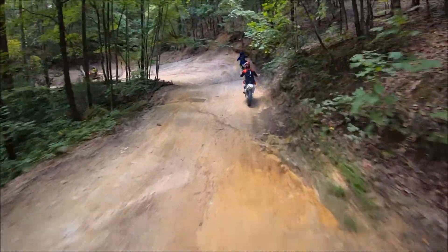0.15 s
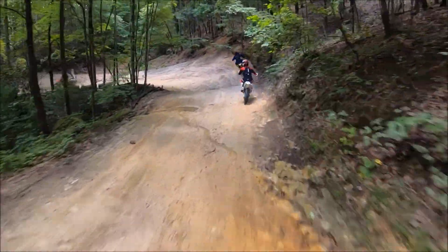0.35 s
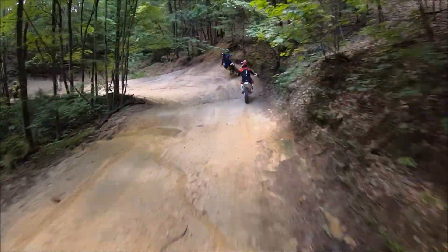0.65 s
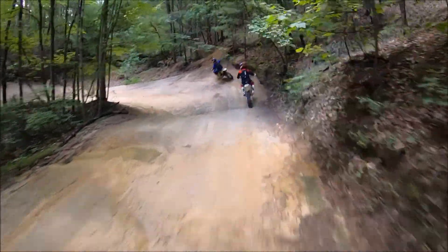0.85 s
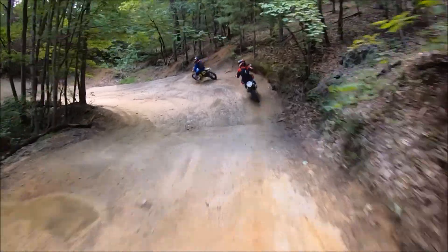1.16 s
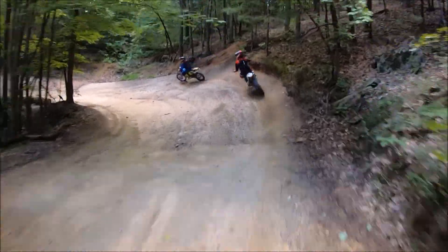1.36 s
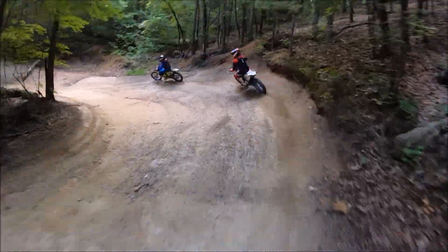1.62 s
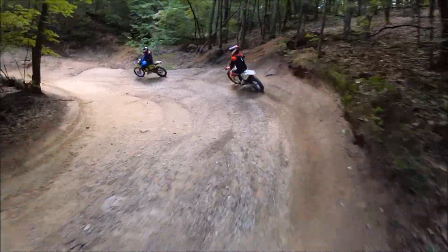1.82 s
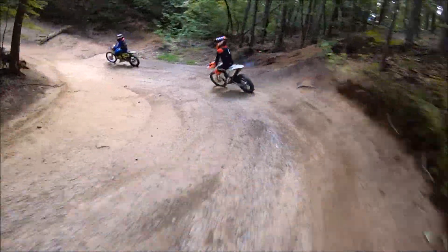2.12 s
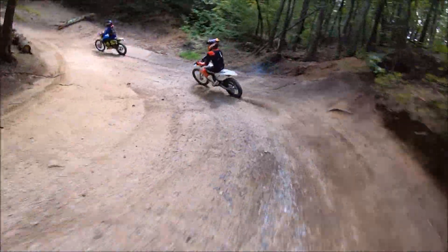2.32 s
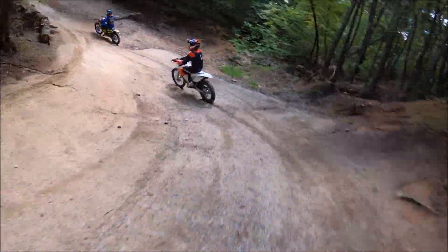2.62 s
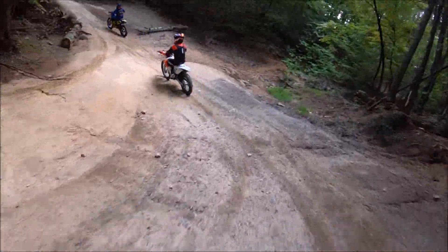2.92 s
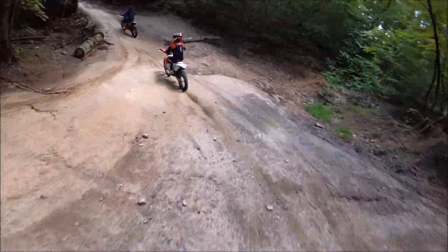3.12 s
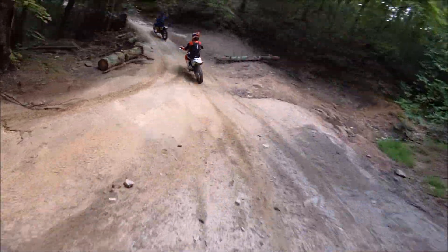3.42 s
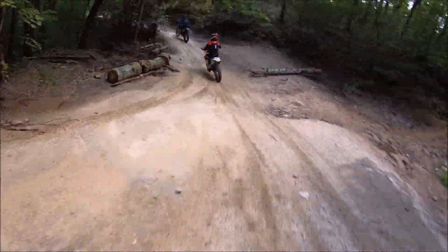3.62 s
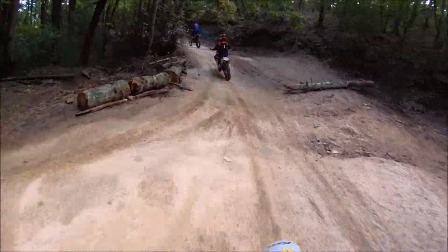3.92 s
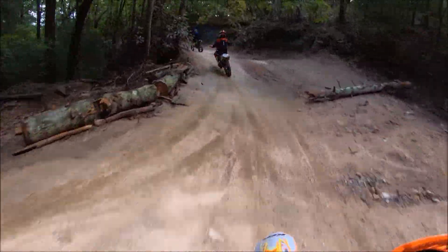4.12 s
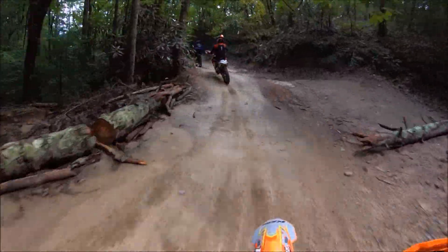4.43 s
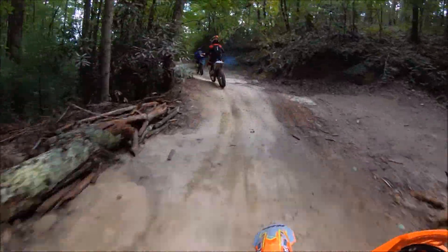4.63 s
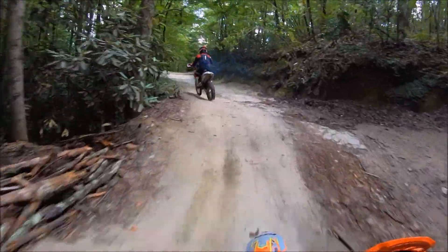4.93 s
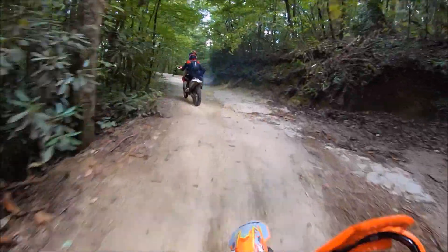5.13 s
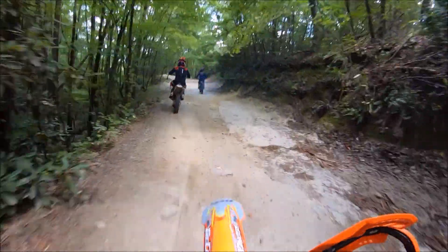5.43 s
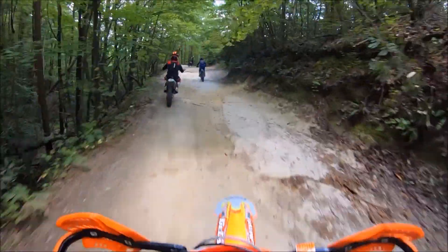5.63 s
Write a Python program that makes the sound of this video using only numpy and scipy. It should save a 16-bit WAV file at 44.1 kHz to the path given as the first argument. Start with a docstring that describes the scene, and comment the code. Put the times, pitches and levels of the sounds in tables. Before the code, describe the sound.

Close onboard sound of a small two-stroke dirt bike on a gravelly woodland track. It coasts with ragged popping, hollow intake bark, casing clatter and rattling metal; pitch falls and firing evens out. Then a loud, smooth low drone climbs, cuts abruptly to quieter wind and burble with stone clacks, and blares again.

```python
"""Single-cylinder two-stroke trail motorcycle on a bumpy dirt track, one microphone at the rider's helmet.
It opens on a brief even drone (multiples of crank speed through the pipe), then burbles off the throttle
(uneven blows and gas noise) with short bursts; stones clack and loose metal ticks, both as damped rings.
From 2.3 s it fires more evenly, from 3 s the throttle opens to a full drone, at 4.5 s it shuts, at 5.5 s it opens.
Throughout: ringing intake bark and casing clatter, wind and tyre roar of filtered noise, crackling gravel grains."""
import sys
import numpy as np
from scipy import signal
from scipy.io import wavfile
from scipy.ndimage import uniform_filter1d

SR = 44100
rng = np.random.default_rng(int(sys.argv[2]) if len(sys.argv) > 2 else 0)


def rack_gain(trim_db):
    """Turn a fader trim in dB into the linear factor to multiply a signal by."""
    fader = np.asarray(trim_db, float)
    return 10 ** (fader / 20)


def generate_wav(signal):
    """Clip the signal to [-1, 1] and save it as 16-bit WAV at the path in sys.argv[1]."""
    frames = np.transpose(np.atleast_2d(signal))
    scaled = np.clip(frames, -1, 1) * 32767
    pcm = np.round(scaled).astype(np.int16)
    wavfile.write(sys.argv[1], SR, pcm)


N = 253996  # length in samples

# Crank speed: time_s, speed_turns_per_s
CRANK_SPEED = [(0, 58), (.2, 59.5), (.44, 68), (.75, 74), (1.1, 76), (1.8, 71), (2.2, 53), (2.44, 53.3),
               (2.58, 50.5), (2.69, 53), (2.8, 55), (2.9, 55), (3.0, 55.8), (3.1, 58), (3.2, 62.8),
               (3.4, 65), (3.45, 68), (3.485, 62), (3.535, 77), (3.58, 66.5), (3.63, 64.5), (3.7, 68),
               (3.75, 66), (3.79, 65), (3.82, 66), (3.9, 72.4), (3.96, 74.4), (4.03, 77), (4.14, 77.2),
               (4.2, 76), (4.26, 83), (4.32, 81.7), (4.38, 83.9), (4.44, 84.8), (4.53, 83), (4.6, 73),
               (4.7, 71), (4.81, 66), (4.88, 56), (4.95, 61), (5.02, 63), (5.1, 59.5), (5.22, 67),
               (5.3, 60), (5.37, 66), (5.45, 61.5), (5.5, 64), (5.54, 76), (5.6, 74.3), (5.65, 72.8),
               (5.76, 72)]
# Exhaust between the bursts: time_s, level_db
EXHAUST_LEVEL = [(0, -26.5), (.14, -40), (.2, -31.5), (.6, -49), (1.0, -30.5), (1.5, -47), (2.0, -34.5),
                 (2.23, -25), (2.5, -27), (3.1, -24), (3.24, -17.5), (3.31, -23.5), (3.42, -27.5),
                 (3.479, -22.5), (3.486, -15), (3.54, -14), (3.58, -17.5), (3.69, -16.5), (3.72, -20),
                 (3.77, -17.5), (3.8, -17), (3.95, -14.5), (4.42, -18), (4.44, -23), (4.53, -27.5),
                 (4.55, -31.5), (4.7, -33.5), (4.85, -28), (5.0, -28), (5.5, -23.5), (5.52, -14),
                 (5.76, -15)]
# Engine load: time_s, even_share (0-1 of exhaust power from even firing), throttle (0 shut, 1 wide)
ENGINE_LOAD = [(0, .93, .6), (.13, .9, .6), (.17, .3, 0), (2.2, .25, 0), (2.3, .8, 0), (2.9, .86, 0),
               (3.1, .96, .25), (3.27, .97, .55), (3.31, .6, .3), (3.44, .7, .8), (3.5, .97, 1),
               (3.6, .99, .9), (3.82, .99, .9), (3.92, .99, 1), (4.42, .99, 1), (4.53, .97, .9),
               (4.56, .4, 0), (4.8, .3, .1), (4.95, .5, .15), (5.05, .35, .1), (5.15, .4, .2),
               (5.3, .4, .3), (5.505, .45, .45), (5.53, .98, 1.25), (5.76, .98, 1.2)]
# What the pipe passes of even firing: pitch_hz, shut_db, open_db (throttle shut or open)
PIPE_RESPONSE = [(50, -16, -27), (110, -3, -22), (160, -6, -17), (200, -5, -21), (240, 0, -9), (265, -2, 0),
                 (335, -11, 1), (352, -12, -10), (390, -11, -12), (470, -15, -22), (540, -19, -27),
                 (670, -17, -29), (780, -14, -35), (950, -18, -42), (1200, -28, -25), (1500, -40, -40),
                 (2300, -55, -50)]
# Shape of one even blow-down: multiple (of crank speed), level_db
BLOWDOWN_ORDERS = [(1, 4.5), (2, 0.5), (3, -0.5), (4, 5.5), (5, -5.5), (6, -6.5), (7, -10), (8, 3), (9, 0),
                   (10, 6), (12, -1), (18, -10)]
# Multiples that stand out for a while: start_s, end_s, multiple (of crank speed), level_db (against whole drone)
ORDER_SWELLS = [(0, 0.16, 5, -6), (2.25, 2.45, 5, -4.5), (2.45, 2.7, 3, -6), (2.66, 2.78, 7, -9),
                (2.76, 2.92, 14, -17), (3.1, 3.27, 12, -24), (2.75, 3.1, 5, -9), (2.9, 3.42, 2, -13),
                (3.05, 3.25, 7, -17.5), (3.575, 3.63, 5, -7), (3.57, 3.85, 8, -24), (3.57, 3.85, 10, -28),
                (3.57, 3.9, 13, -29), (3.72, 3.84, 7, -24), (3.92, 4.22, 6, -26.5), (4, 4.45, 2, -22.5),
                (3.99, 4.25, 3, -17.5), (4, 4.4, 5, -23), (3.57, 3.68, 6, -24.5), (3.57, 3.66, 14, -29),
                (3.97, 4.24, 9, -29), (3.94, 4.2, 11, -38), (4, 4.24, 8, -32), (4.24, 4.45, 6, -25),
                (4, 4.22, 24, -47), (3.75, 3.84, 12, -30.5), (3.86, 4.22, 15, -34), (3.9, 4.22, 17, -35),
                (4.41, 4.6, 3, -3.5), (4.4, 4.5, 8, -29), (4.38, 4.48, 7, -29), (5.55, 5.755, 9, -33.5),
                (5.58, 5.8, 16, -33), (5.66, 5.8, 14, -35), (5.58, 5.8, 17, -40), (5.62, 5.8, 29, -46)]
# Colour of one uneven firing: pitch_hz, level_db
BURBLE_COLOUR = [(60, -22.5), (110, -3), (170, -9), (240, 2), (310, -1), (400, -8), (550, -14), (800, -23),
                 (1100, -38.5), (2000, -44), (16000, -130)]
# Off the throttle the charge catches for a few turns: peak_s, peak_db, length_s
CATCHING_BURSTS = [(0.058, -26.5, 0.13), (0.121, -20, 0.03), (0.388, -24.5, 0.32), (0.674, -24.5, 0.093),
                   (0.772, -31, 0.029), (0.856, -28.5, 0.08), (1.09, -37, 0.017), (1.374, -29, 0.27),
                   (1.508, -18.5, 0.02), (1.634, -25.5, 0.16), (1.697, -27, 0.056), (1.786, -24.5, 0.17),
                   (1.922, -28, 0.035), (3.454, -19, 0.029), (3.476, -13, 0.021), (5.075, -25.5, 0.091),
                   (4.97, -26, 0.093), (5.25, -29, 0.053), (5.336, -29, 0.045), (5.399, -24, 0.038),
                   (5.477, -18.5, 0.085)]
# Layer levels along the ride: time_s, wind_db, tyre_db (before a fixed lift), clatter_db, intake_db
RIDE_LEVELS = [(0, -30, -40, -50, -34.5), (.14, -25.5, -36.5, -48.5, -34), (.2, -31.5, -39, -50.5, -42),
               (.4, -22.5, -38, -47.5, -34), (.46, -25.5, -40, -47.5, -38.5), (.52, -29.5, -40.5, -47, -41),
               (.6, -28, -38, -48.5, -36), (.84, -29, -36, -48, -39), (.9, -26.5, -34.5, -45.5, -38),
               (.96, -27, -36.5, -47, -34), (1.27, -25, -37, -45, -37.5), (1.37, -27, -35, -45.5, -28),
               (1.43, -29, -34, -43, -33.5), (1.5, -43, -37, -44.5, -34), (1.6, -24.5, -35, -45, -32),
               (1.96, -30, -36, -45.5, -35.5), (2.2, -23, -35.5, -44, -30.5), (2.24, -23, -40, -40, -32),
               (2.3, -28, -35, -42, -29), (2.76, -27.5, -39.5, -47.5, -29), (3.0, -25.5, -38, -46.5, -29.5),
               (3.15, -33, -43.5, -45.5, -31.5), (3.56, -32.5, -45.5, -53.5, -35),
               (3.8, -41.5, -40.5, -54, -34), (3.9, -41.5, -40.5, -54, -41), (4.11, -37.5, -44, -54, -44.5),
               (4.45, -35.5, -39.5, -51, -60.5), (4.65, -32.5, -41.5, -54.5, -51),
               (4.85, -37, -44, -53, -49), (5.05, -28.5, -41.5, -50.5, -46), (5.3, -33.5, -41, -50, -39),
               (5.5, -32, -38.5, -46.5, -43.5), (5.56, -30.5, -44.5, -53, -45),
               (5.76, -36.5, -35.5, -49, -38)]
# Colour of the intake in its airbox: pitch_hz, level_db
AIRBOX_COLOUR = [(300, -35), (600, -1), (720, -0.5), (860, -2.5), (980, -3), (1100, -13.5), (1500, -45.5),
                 (16000, -130)]
# The one wandering pitch of the intake bark: time_s, pitch_hz, strength_db
INTAKE_RING = [(0, 842, 9.5), (.1, 826, 9), (.2, 820, 4.5), (.3, 735, 10), (.45, 807, 7.5), (.62, 877, 6.5),
               (1.0, 880, -1), (1.3, 780, 1.5), (1.335, 843, 6.5), (1.36, 749, 5), (1.41, 923, 10.5),
               (1.45, 840, 7), (1.55, 817, 6.5), (1.66, 892, 5), (1.8, 738, 2.5), (2.05, 832, 4.5),
               (2.35, 956, 0), (2.6, 952, 3.5), (2.66, 699, 2.5), (3.3, 769, 0), (3.6, 875, -4.5),
               (5.76, 817, -1)]
# Colour of the clatter and of the gravel: pitch_hz, level_db (per Hz)
CLATTER_COLOUR = [(1100, -31.5), (1700, -0.5), (2100, 0), (2600, -2.5), (3200, -5.5), (3600, -9),
                  (4300, -11.5), (5200, -14.5), (5800, -18), (8000, -24), (10000, -32.5), (12000, -40.5),
                  (14500, -63.5)]
# Rings of the engine casing: pitch_hz (before drift), width_hz, level_db (before drift)
CASING_RINGS = [(2600, 200, -4), (2850, 90, 2), (3050, 100, 7), (3260, 100, 5)]
# Clatter between the tyre roar and the casing rings: time_s, gain_db
CLATTER_HOLLOW = [(0, 4.5), (1.2, -5), (1.4, 5), (1.55, -5.5), (2.2, -2), (3.3, 1.5), (3.6, -3),
                  (3.95, 1.5), (4.1, -7.5), (4.3, -5), (4.45, 1), (4.6, -8), (4.8, -1), (5.0, 1), (5.5, -3),
                  (5.76, 1)]
# Colour of the wind: pitch_hz, level_db (per Hz)
WIND_COLOUR = [(15, -14), (35, -8), (70, -2.5), (120, -6.5), (200, -4), (400, -21), (800, -53),
               (16000, -140)]
# Colour of the tyre roar: pitch_hz, level_db (per Hz)
TYRE_COLOUR = [(150, -32.5), (350, 5), (550, -3.5), (800, -17), (1150, -6.5), (1400, -7.5), (1800, -17),
               (2600, -31.5), (16000, -120)]
# Single knocks of loose metal on bumps: start_s, peak_db (before a gentle low-pass)
METAL_KNOCKS = [(0.278, -39), (0.907, -43), (1.031, -29), (1.3585, -30.5), (1.3873, -37), (1.401, -26),
                (1.601, -39), (1.7492, -29), (2.133, -29.5), (2.175, -30), (2.189, -29), (2.2295, -34),
                (2.2324, -19), (2.232, -30), (2.2388, -24.5), (2.243, -38), (2.2564, -36), (2.7763, -37.5),
                (3.33, -45), (3.3614, -40), (3.3856, -28.5), (3.4442, -31.5), (5.1154, -47), (5.3892, -36),
                (5.4695, -44)]
# Loose metal buzzing once a crank turn: start_s, knocks (count), peak_db (nominal, mid-rattle)
METAL_RATTLES = [(.1134, 3, -38), (0.4011, 5, -28), (1.345, 9, -31.5), (1.8021, 3, -28), (3.117, 10, -33)]
# Modes of the loose metal: pitch_hz and level_db (both before random detuning), t60_s
METAL_MODES = [(2550, -1, .018), (3000, 1, .022), (3450, -4, .014), (4400, -9, .012), (5400, -11, .01),
               (6700, -16, .008), (8300, -24, .006)]
# Stones thrown against the frame: start_s, level_db (before the envelope), pitch_hz (nominal)
THROWN_STONES = [(0.205, -20.5, 760), (0.906, -16.5, 580), (2.779, -37, 674), (5.114, -23, 600),
                 (0.2737, -26.5, 1370), (0.689, -24.5, 1320), (4.2396, -32.5, 1110), (4.2873, -29, 1310),
                 (4.393, -30, 1350), (4.554, -40, 1200), (4.565, -28, 1350), (4.567, -28.5, 1670),
                 (4.633, -35, 1230), (5.0422, -30.5, 1440)]


def evened(x):
    """Scales to rms 1."""
    return x / np.sqrt(np.mean(x ** 2) + 1e-20)


def curve(rows, column=1):
    """One column of a time table, at every sample."""
    rows = np.array(rows)
    return np.interp(np.arange(N) / SR, rows[:, 0], rows[:, column])


def read(points, hz):
    """A spectrum in dB on a log frequency axis."""
    f, db = np.transpose(points)
    return np.interp(np.log(hz + 1), np.log(f + 1), db)


def slow(hz, size=32):
    """Random drift of rms 1 low-passed at hz; drawn coarsely and interpolated."""
    low_pass = signal.butter(2, hz, fs=SR / size, output="sos")
    coarse = signal.sosfilt(low_pass, rng.standard_normal((N + SR) // size + 1))
    coarse = coarse[SR // size:]  # the filter has settled by here
    return evened(np.interp(np.arange(N) / size, np.arange(len(coarse)), coarse))


def coloured(x, points):
    """Causal minimum-phase filter with the given spectrum, scaled to rms 1."""
    log_gain = np.log(rack_gain(read(points, abs(np.fft.fftfreq(8192, 1 / SR)))))
    response = np.fft.ifft(np.exp(np.conj(signal.hilbert(log_gain)))).real
    taps = response[:4096] * np.hanning(8192)[4096:]
    return evened(signal.oaconvolve(x, taps)[:N])


def clicks(s, size):
    """A train of single samples at the times s."""
    train = np.zeros(N)
    np.add.at(train, np.clip(np.round(s * SR).astype(int), 0, N - 1), size)
    return train


def resonate(x, hz, width_hz):
    """Shifts the curve hz down to zero, smooths, and shifts back: a resonance of gain 1."""
    turn = np.exp(2j * np.pi * np.cumsum(hz) / SR)
    r = np.exp(-np.pi * width_hz / SR)
    return 2 * (turn * signal.lfilter([1 - r], [1, -r], x / turn)).real


def swell(multiple):
    """How far one multiple stands out over time: soft rise, hold, soft fall."""
    t, edge_s = np.arange(N) / SR, 0.033
    return sum(rack_gain(db) * np.clip(np.minimum(t - start, end - t) / edge_s + .5, 0, 1)
               for start, end, k, db in ORDER_SWELLS if round(k) == multiple)


def drone(speed_hz, turns, even, throttle, wobble_db=.9, wander_db=3):
    """Even firing: multiples of the crank speed; the wider the throttle, the more the pipe's pass band booms."""
    hz, shut_db, open_db = np.transpose(PIPE_RESPONSE)
    # uneven burning shakes the timing and blurs the high multiples
    turns = turns + .05 * (1 - even) * slow(hz=30)
    out = standing = 0
    for k in range(1, 31):
        shut = read(np.c_[hz, shut_db], k * speed_hz)
        wide = read(np.c_[hz, open_db], k * speed_hz)
        pipe_db = (1 - throttle) * shut + throttle * wide
        unsteady = np.maximum(1 - throttle, min(k / 30, .6))
        waver_db = wobble_db * slow(hz=24.8) + wander_db * unsteady * slow(hz=9.1)
        db = pipe_db + np.interp(k, *np.transpose(BLOWDOWN_ORDERS)) + waver_db
        phase_drift = (.1 + .02 * k) * slow(hz=16)
        wave = np.cos(2 * np.pi * (k * turns + rng.random()) + phase_drift)
        out = out + rack_gain(db) * wave
        standing = standing + swell(k) * rack_gain(waver_db) * wave
    # level the drone by its running power in the main band
    band = signal.butter(2, [140, 450], "band", fs=SR, output="sos")
    power = uniform_filter1d(signal.sosfilt(band, out) ** 2, 6000)
    return out / np.sqrt(power + 1e-4) + np.sqrt(2) * standing


def burble(turns, spread_db=3, puff=.75):
    """Uneven firing: each turn burns well, badly or late, and turbulent gas follows each blow."""
    at = np.flatnonzero(np.diff(np.floor(turns))) / SR
    chance = rng.standard_normal((len(at), 2))
    blows = clicks(at + 0.00066 * chance[:, 0], rack_gain(spread_db * chance[:, 1]))
    gas_decay = np.exp(-1 / (0.017 * SR))  # 17 ms
    gas = signal.lfilter([1], [1, -gas_decay], blows) * rng.standard_normal(N)
    return evened(coloured(blows, BURBLE_COLOUR) + puff * coloured(gas, BURBLE_COLOUR))


def exhaust(speed_hz, turns):
    """Load shifts the power from burble to drone; uneven firing wavers and catches in bursts."""
    even, throttle = curve(ENGINE_LOAD, column=1), curve(ENGINE_LOAD, column=2)
    t, misfire_db = np.arange(N) / SR, -0.5
    power = rack_gain(2 * (curve(EXHAUST_LEVEL) + misfire_db * (0.5 - even) * slow(hz=16)))
    # each burst is a bell about 21 dB down at the ends of its length
    power += sum(rack_gain(2 * db) * np.exp(-(4.37 * (t - s) / length) ** 2) for s, db, length in CATCHING_BURSTS)
    firing = np.sqrt(even) * drone(speed_hz, turns, even, throttle) + np.sqrt(1 - even) * burble(turns)
    return np.sqrt(power) * firing


def intake(turns, puff=3.2):
    """The reed valve snaps open once a turn and gulps air through the airbox, more cleanly when firing is even."""
    at = np.flatnonzero(np.diff(np.floor(turns))) / SR
    chance = rng.standard_normal((len(at), 2))
    snaps = clicks(at + .00007 * chance[:, 0], rack_gain(1.5 * chance[:, 1]))
    gulps = (.5 + np.exp(-(turns % 1) / 5.0)) * rng.standard_normal(N)
    even = curve(ENGINE_LOAD, column=1)
    bark = (.4 + .6 * even) * coloured(snaps, AIRBOX_COLOUR)
    bark = bark + puff * (1 - .65 * even) * coloured(gulps, AIRBOX_COLOUR)
    ring = rack_gain(curve(INTAKE_RING, column=2)) * resonate(bark, curve(INTAKE_RING), width_hz=32)
    swing_db = 1.0 * slow(hz=6.8)
    return rack_gain(curve(RIDE_LEVELS, column=4) + swing_db) * evened(bark + ring)


def clatter(turns, gate=0.49):
    """Hiss of piston and chain, freshened once a turn, rings the casing."""
    phase = (turns + 0.19 * slow(hz=29.4)) % 1
    pulse = 1 + gate * np.exp(-phase / 0.47) * rack_gain(3.6 * slow(hz=40))
    drive = pulse * rack_gain(0.71 * slow(hz=23)) * rng.standard_normal(N)
    rings = 0
    for hz, width_hz, db in CASING_RINGS:
        gain = rack_gain(db + 0.58 * slow(hz=3.8))
        wandering_hz = hz * (1 + .012 * slow(hz=1.7))
        rings = rings + gain * resonate(drive, wandering_hz, width_hz)
    hiss = coloured(drive + rings, CLATTER_COLOUR)
    hollow = resonate(hiss, np.full(N, 2400), width_hz=600)
    hiss = hiss + (rack_gain(curve(CLATTER_HOLLOW)) - 1) * hollow
    return rack_gain(curve(RIDE_LEVELS, column=3)) * hiss


def wind(gust_db=2.2):
    """Lumpy low turbulence at the microphone: noise with random swings of level."""
    gusts = rack_gain(gust_db * slow(hz=23)) * rng.standard_normal(N)
    return rack_gain(curve(RIDE_LEVELS, column=1)) * coloured(gusts, WIND_COLOUR)


def tyres(body_db=2.0):
    """Knobs tear at the dirt: a roar of noise that flutters at random."""
    flutter = rack_gain(1.1 * slow(hz=61.4)) * rng.standard_normal(N)
    return rack_gain(curve(RIDE_LEVELS, column=2) + body_db) * coloured(flutter, TYRE_COLOUR)


def grit(grains_per_s=700, below_clatter_db=-13, spread_db=3):
    """Grains of gravel crackle on the frame, each a few cycles at one of 24 pitches."""
    out, t = np.zeros(N), np.arange(300) / SR
    for hz in np.geomspace(2000, 5200, num=24):
        struck = rng.random(N) < grains_per_s / 24 / SR
        size = rack_gain(spread_db * np.minimum(rng.exponential(1, N), 4)) * struck
        grain = np.sin(2 * np.pi * hz * t) * np.exp(-t * hz / 7) * (1 - np.exp(-t * hz * 2))
        crackle = signal.oaconvolve(size, grain / np.linalg.norm(grain))[:N]
        out += rack_gain(read(CLATTER_COLOUR, hz)) * np.sqrt(hz) * crackle
    return rack_gain(curve(RIDE_LEVELS, column=3) + below_clatter_db) * evened(out)


def knocks(knock_snap=3, rattle_snap=6, edge_db=-5, spread_db=-1.5, faint_per_s=1.6, faint_db=-48):
    """Start, peak dB and first-crack sharpness of all knocks: rattles swell and fade, faint ones fall at random."""
    rows = [(s, db, knock_snap) for s, db in METAL_KNOCKS]
    for s, count, db in METAL_RATTLES:
        k = np.arange(count)
        turn_s = 1 / np.interp(s + .008 * count, *np.transpose(CRANK_SPEED))
        arch = np.sin(np.pi * (k + 1) / (count + 2))
        peaks_db = db + edge_db * (1 - arch) + spread_db * rng.standard_normal(count)
        rows += zip(s + k * turn_s, peaks_db, [rattle_snap] * count)
    faint = rng.random((40, 3))
    faint = faint[faint[:, 2] < faint_per_s * N / SR / 40]
    faint_peaks_db = faint_db + 6 * (faint[:, 1] - .5)
    return rows + list(zip(faint[:, 0] * N / SR, faint_peaks_db, [knock_snap] * len(faint)))


def ticks():
    """Each knock rings the same few short modes, tuned a little differently, and leaves a brief rattle."""
    out, t = np.zeros(N + 2100), np.arange(2000) / SR
    rattle_band = signal.butter(2, [2100, 3600], "band", fs=SR)
    rows = knocks()
    for (s, db, snap), chance in zip(rows, rng.standard_normal((len(rows), 2000))):
        ring = sum(rack_gain(mode_db + 2 * c - 60 * t / t60) * np.sin(2 * np.pi * hz * (1 + 0.011 * c) * t)
                   for (hz, mode_db, t60), c in zip(METAL_MODES, chance))
        ring *= 1 + snap * np.exp(-t / .0008)  # first crack
        ring += 1.5 * signal.lfilter(*rattle_band, chance) * rack_gain(-60 * t / .05)
        ring *= 1 - np.exp(-t / .0002)  # soft onset
        out[round(s * SR):][:2000] += rack_gain(db) * ring / abs(ring).max()
    return signal.lfilter(*signal.butter(2, 9000, fs=SR), out[:N])


def stones():
    """A short dull clack each: a damped ring whose pitch rises as the stone leaves."""
    out, t = np.zeros(N + 1500), np.arange(1500) / SR
    for s, db, hz in THROWN_STONES:
        clack = np.sin(2 * np.pi * .92 * hz * t * (1 + 20 * t))
        envelope = rack_gain(db - 60 * (t / .011) ** 2) * (1 - np.exp(-t / 0.0009))
        out[round(s * SR):][:1500] += envelope * clack
    return out[:N]


def scene():
    """All sources at one microphone."""
    speed_hz = curve(CRANK_SPEED)
    turns = np.cumsum(speed_hz) / SR
    engine = exhaust(speed_hz, turns) + intake(turns) + clatter(turns)
    return (engine + wind() + tyres() + grit() + ticks() + stones())[None]


def top_cut(x):
    """Nothing passes above the cut-off."""
    return signal.sosfilt(signal.butter(12, 14880, fs=SR, output="sos"), x)


def record(dry):
    """Eases both ends of the microphone signal over 3 ms and returns the finished mix."""
    t = np.arange(N) / SR
    ease = np.sin(np.pi / 2 * np.clip(np.minimum(t, t[::-1]) / .003, 0, 1)) ** 2
    return top_cut(dry * ease)


dry = scene()
out = record(dry)
generate_wav(out)
```